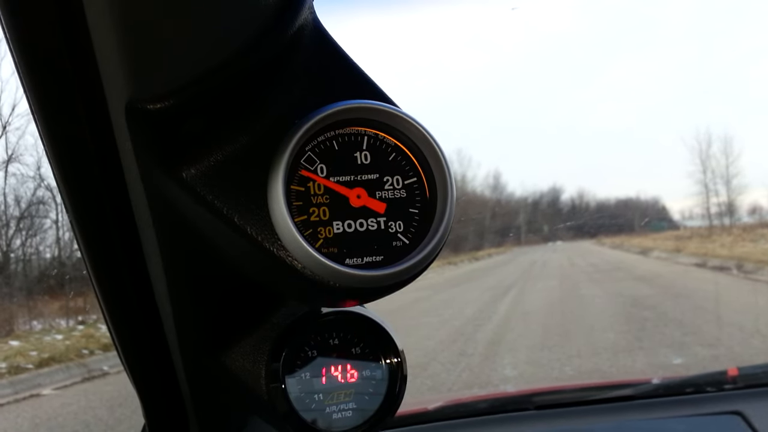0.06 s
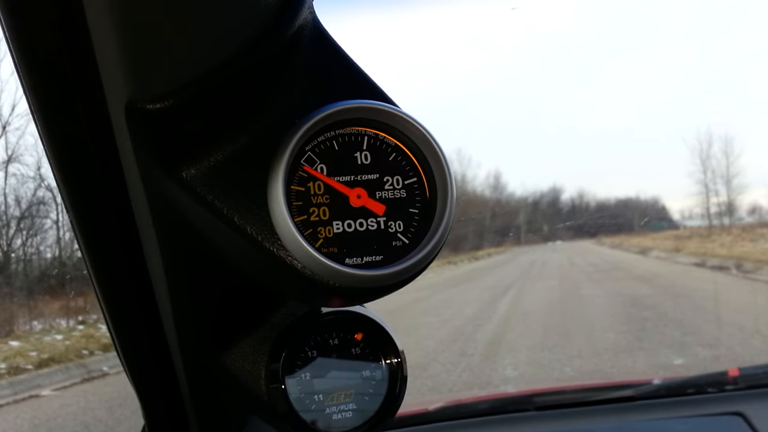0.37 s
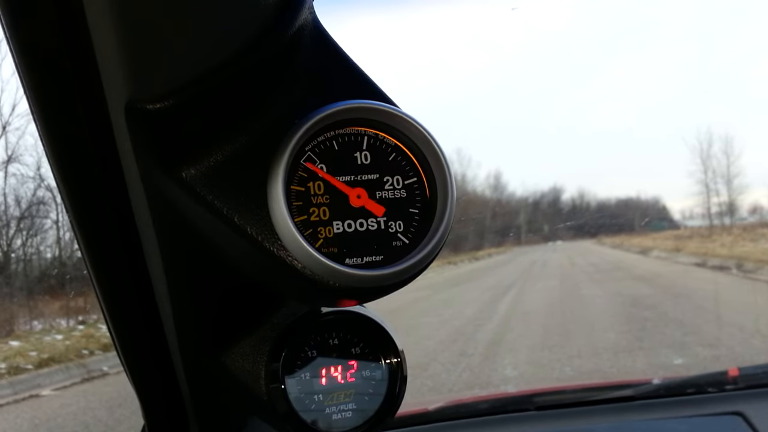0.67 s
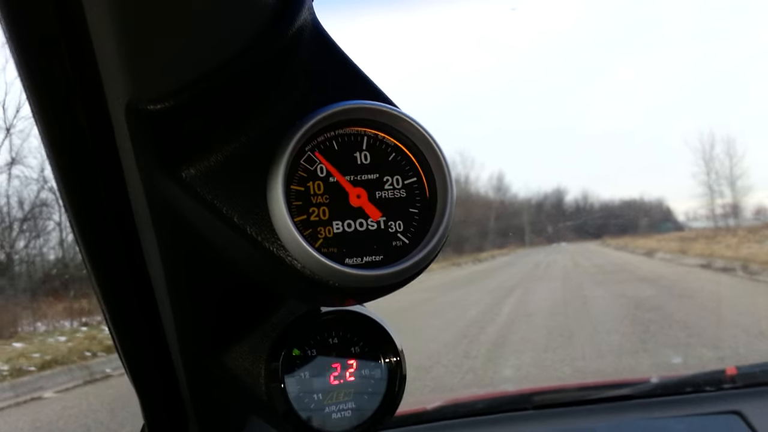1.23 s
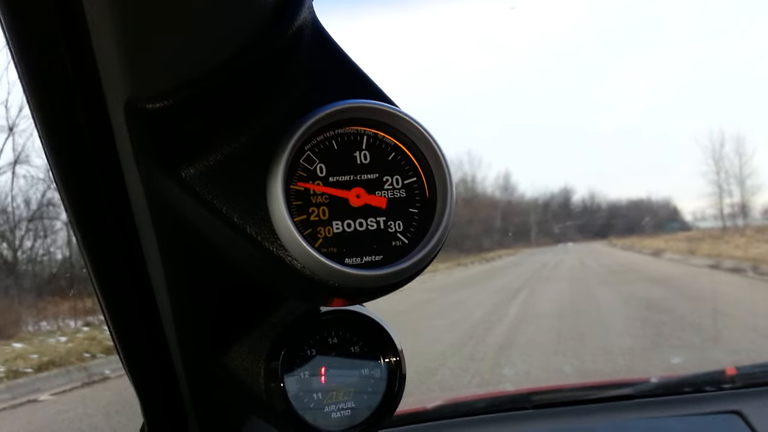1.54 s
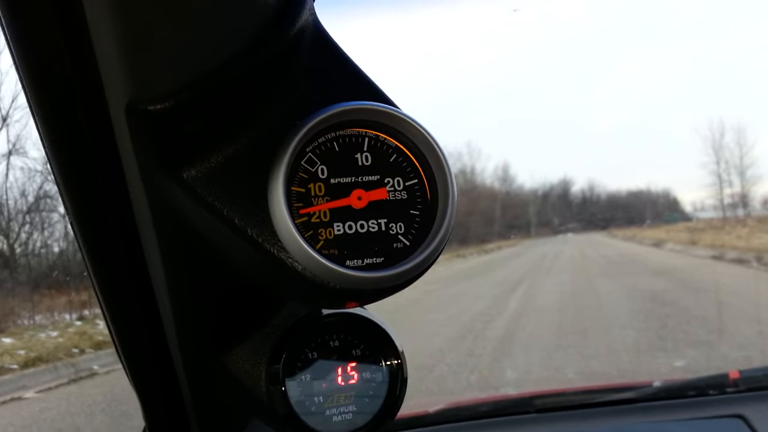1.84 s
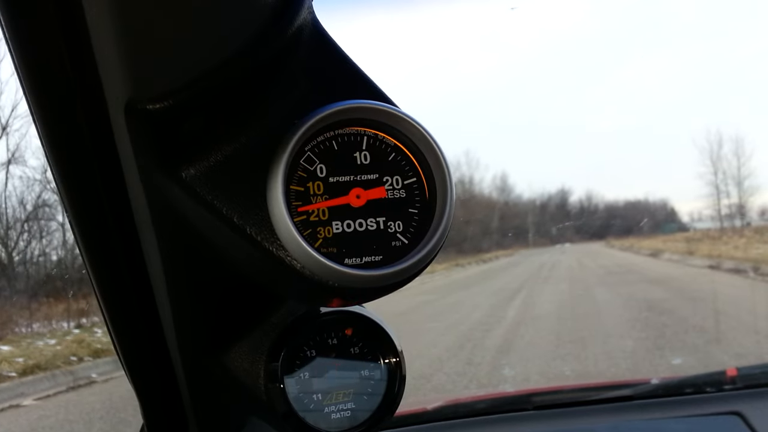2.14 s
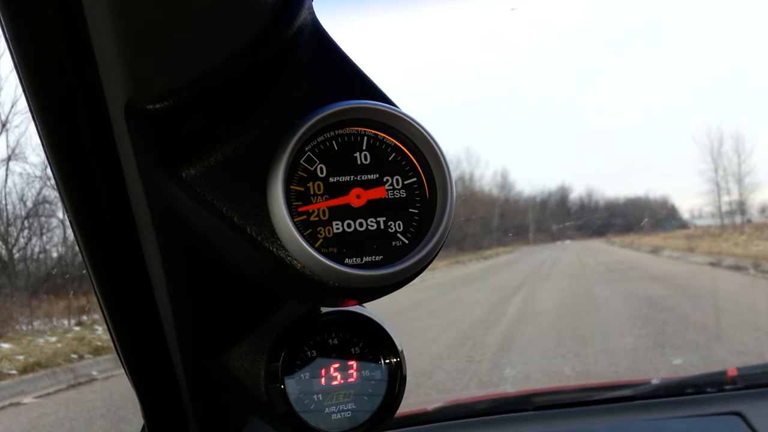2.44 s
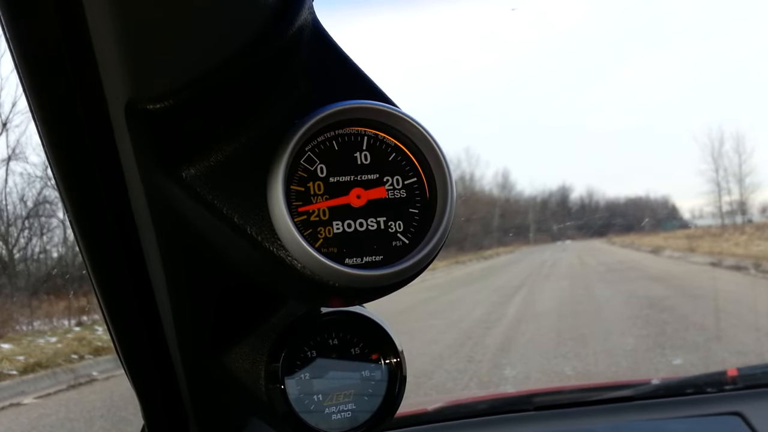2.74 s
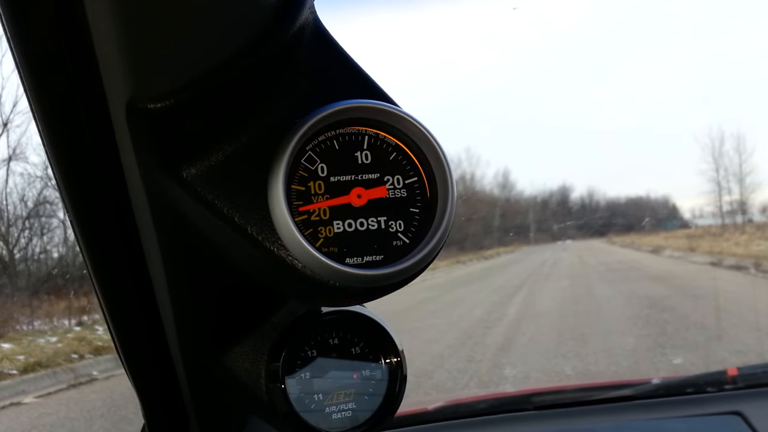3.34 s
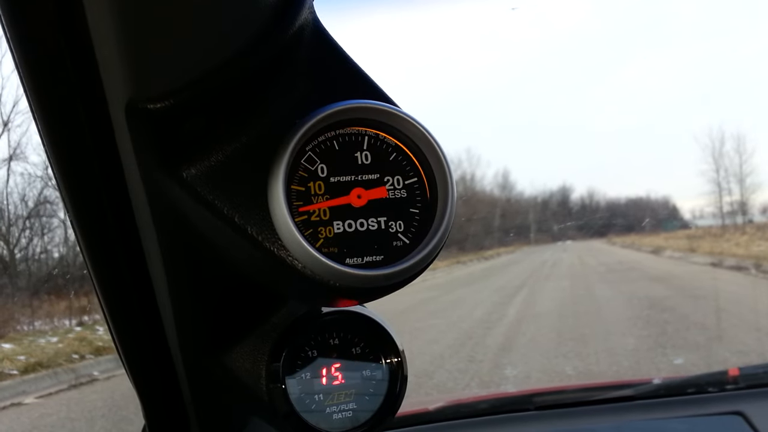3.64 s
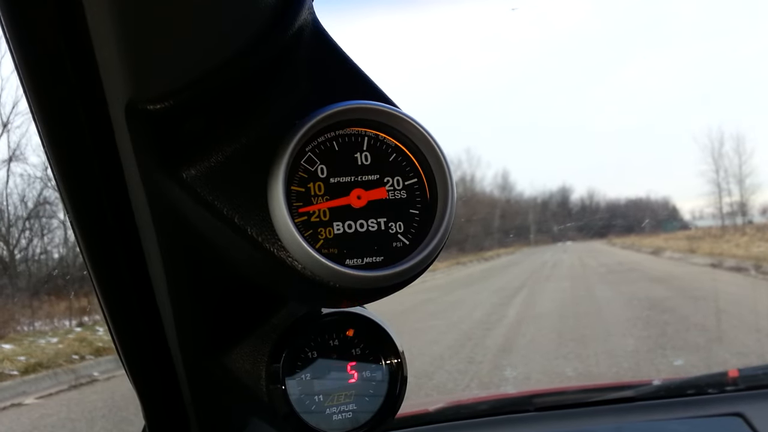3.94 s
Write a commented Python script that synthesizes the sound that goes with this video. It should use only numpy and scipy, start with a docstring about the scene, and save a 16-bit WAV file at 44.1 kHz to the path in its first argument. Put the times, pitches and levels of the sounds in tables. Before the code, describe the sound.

A turbocharged car engine pulls at full throttle, heard inside the cabin, with booming exhaust, rasping intake and a rising whistle. At about 1.5 seconds the throttle shuts: air rushes out and the revs drop quickly. Dull thuds and small rattles come from around 1 second on. From 2 to 4 seconds the whistle falls and the hiss fades over a quieter low drone and steady tyre noise.

```python
"""Inside a turbocharged six-cylinder car, a stereo microphone in the cabin, close to the driver.
At first the engine pulls at full throttle: exhaust pulses boom in the cabin, the intake rasps and
the turbo whistles upward over the road noise. At 1.5 s the driver lifts off: the boost rushes out
and the revs drop. Then the turbo coasts down over a low drone and a fading hiss.
From about 1 s on, the body gives a few dull thuds and small rattles."""
import sys
import numpy as np
from scipy import signal
from scipy.fft import rfft, irfft
from scipy.io import wavfile

SR = 44100
rng = np.random.default_rng(int(sys.argv[2]) if len(sys.argv) > 2 else 0)


def output_pcm(signal):
    """Save a mono or channel-first signal as 16-bit PCM at the path in sys.argv[1].

    Samples are clipped to [-1, 1] before scaling.
    """
    pcm = np.clip(np.atleast_2d(signal).T, -1, 1) * 32767
    wavfile.write(sys.argv[1], SR, np.round(pcm).astype(np.int16))


N = 176400

# intake resonances (centre [Hz], width [Hz], lift [dB])
INTAKE_PEAKS = [(1088, 19, 9.6), (1456, 90, 6), (1744, 37, 7), (1875, 98, 5.9), (2550, 85, 5.5),
                (3380, 60, 5.6), (3970, 340, 2.4)]


def undb(db):
    """Decibels to gain."""
    return 10 ** (np.asarray(db) / 20)


def curve(rows):
    """A control joined by straight lines in time."""
    return np.interp(np.arange(N) / SR, *np.array(rows).T)


def at(rows, hz):
    """Read a spectrum on a log-frequency axis."""
    freqs, db = np.array(rows).T
    return np.interp(np.log(hz + 1e-6), np.log(freqs), db)


def bins():
    """The frequencies of the spectrum."""
    return np.arange(N // 2 + 1) * SR / N


def walk(hz):
    """Smooth random motion of spread 1, up to about hz."""
    drift = irfft(rfft(rng.standard_normal(N)) * np.exp(-.5 * (bins() / hz) ** 2), N)
    return drift / drift.std()


def turning(hz):
    """Phase of something that turns at hz."""
    return 2 * np.pi * np.cumsum(hz) / SR


def burst(start, attack_s, decay_s):
    """An envelope that rises and dies away."""
    age = np.maximum(np.arange(N) / SR - start, 0)
    return (1 - np.exp(-age / attack_s)) * np.exp(-age / decay_s)


def resonance(peaks, hz):
    """Lift in dB that resonances give at hz."""
    return sum(db / (1 + (2 * (hz - centre) / width) ** 2) for centre, width, db in peaks)


def rough_tone(hz, rough, width_hz):
    """A stereo tone whose strength and phase waver."""
    waver = np.array([1 + rough * (walk(width_hz) + 1j * walk(width_hz)) for _ in range(2)])
    return (waver * np.exp(1j * turning(hz))).real


def cabin_modes(depth_db=1.7, step_hz=30, full_hz=2000):
    """Treble peaks and dips, in dB, that many cabin modes put on one path to the microphone."""
    hz = np.arange(0, SR / 2, step_hz)
    ripple = rng.standard_normal(4096)[:len(hz)]
    return depth_db * np.interp(bins(), hz, ripple * np.clip(hz / full_hz, 0, 1) ** 2)


def spread(mid, side, hz):
    """Left and right from mid and side, with the cabin's lean."""
    # balance at the microphone (frequency [Hz], left minus right [dB])
    lean = [(110, -1), (370, 2.5), (670, 3), (1150, 4.5), (2200, -1.5), (4130, 0), (7560, -6.5),
            (13800, -2)]
    sign = np.array([[1], [-1]])
    return (mid + sign * side) * undb(sign * at(lean, hz) / 2)


def air(colour, peaks=(), lag_s=.00043, lag_above_hz=2000):
    """Coloured stereo turbulence in the cabin; its treble reaches the left side later."""
    # stereo width (frequency [Hz], side minus mid [dB])
    width = [(30, -12), (60, -19), (200, -19), (370, -9), (670, -3.5), (1230, 3.5), (2260, -1.5),
             (7000, 1.5), (13800, -4)]
    hz = bins()
    gain = undb(at(colour, hz) + cabin_modes() + resonance(peaks, hz))
    mid, side = rfft(rng.standard_normal((2, N))) * gain / np.sqrt(np.mean(gain ** 2))
    left, right = spread(mid, side * undb(at(width, hz)), hz)
    delay = np.exp(-2j * np.pi * hz * lag_s * (hz > lag_above_hz))
    return irfft(np.array([left * delay, right]), N)


def road(level_db=-39, flicker_db=.5):
    """Tyres rolling on the road, a steady bed under everything."""
    # tyre spectrum (frequency [Hz], density [dB])
    colour = [(25, -26), (50, -1), (90, -8), (200, -0.5), (400, 2), (650, -7.5), (900, -9), (1150, -13.5),
              (1500, -17.5), (3000, -30.5), (8000, -38)]
    return air(colour) * undb(level_db + flicker_db * walk(21))


def rattles():
    """Dull thuds through the body and short bright ticks around the microphone."""
    # thuds (time [s], level [dB])
    thuds = [(1.085, -12.5), (1.24, -15), (1.42, -11), (1.59, -25), (1.81, -11.5), (2.4, -19), (2.49, -42)]
    # their spectrum (frequency [Hz], density [dB])
    colour = [(25, -13), (45, -17), (65, 4), (100, -34), (200, 4), (600, -40)]
    # ticks (time [s], level [dB], centre [Hz], width [octaves], decay [s])
    ticks = [(1.072, -25.5, 3400, 0.1, 0.0082), (1.801, -18, 11900, 0.3, .006),
             (2.408, -40, 3500, 1.8, 0.019), (2.612, -36, 3200, .8, .012),
             (2.961, -32.5, 3300, 0.57, 0.0062), (3.742, -40, 3780, 0.65, 0.0037)]
    out = air(colour) * sum(undb(db) * burst(start, attack_s=.06, decay_s=.1) for start, db in thuds)
    for start, db, hz, octaves, decay in ticks:
        band = [(hz * 2 ** (k * octaves), -6 * k * k) for k in range(-3, 4)]
        out += air(band) * undb(db) * burst(start, attack_s=.00093, decay_s=decay)
    return out


def rumble():
    """A low rumble fills the cabin, strongest around the lift-off."""
    # spectrum (frequency [Hz], density [dB])
    colour = [(20, -48), (35, -21), (52, -1.5), (90, -2.5), (170, -2.5), (330, -1), (440, -12), (640, -8.5),
              (850, -29.5), (1500, -45), (3000, -72)]
    # swell (time [s], level [dB])
    level = [(0, -35), (.9, -25.5), (1.1, -20.5), (1.3, -24), (1.55, -19), (1.85, -18.5), (2.05, -22.5),
             (2.25, -27.5), (2.55, -28), (2.9, -31.5), (3.7, -35.5), (4, -33)]
    return air(colour) * undb(curve(level))


def belt_whine(cycle_hz):
    """Belt and valve gear whine under load, louder where they cross an intake resonance."""
    # tones (multiple of the cycle rate, level [dB])
    orders = [(42, -33.5), (54, -36), (58, -33.5), (61.75, -32), (67, -65), (91.7, -37), (108, -35.5)]
    # swell and fade (time [s], level [dB])
    level = [(0, -13), (.45, -12), (.6, -11.5), (1, -11), (1.2, -15), (1.45, -6), (1.55, -20), (1.8, -46)]
    out = 0
    for order, db in orders:
        hz = order * cycle_hz
        out += undb(db + resonance(INTAKE_PEAKS, hz)) * rough_tone(hz, rough=.4, width_hz=5.2)
    return out * undb(curve(level))


def throttle_hiss(flicker_db=.5):
    """Air hisses past the throttle, most just after it shuts."""
    # spectrum (frequency [Hz], density [dB])
    colour = [(800, 8), (1700, 2), (2400, 6), (3200, -0.5), (4100, -2), (5500, -5.5), (7000, -16.5),
              (10000, -16), (14000, -64)]
    # flow (time [s], level [dB])
    level = [(1.5, -43), (1.9, -34.5), (2.3, -38), (2.6, -40), (3, -46), (3.5, -51.5), (4, -52)]
    return air(colour) * undb(curve(level) + flicker_db * walk(57.5))


def intake_rasp(cycle_hz, firing_depth=.12, flicker_db=.5):
    """Air drawn through the resonant intake pulses with the six firings of each cycle."""
    # spectrum (frequency [Hz], density [dB])
    colour = [(300, -9), (600, 10.5), (1000, 1), (1300, -4.5), (2000, -4.5), (3000, -9.5), (4300, -10),
              (5000, -12.5), (6000, -20), (9500, -21.5), (14000, -68.5)]
    # flow (time [s], level [dB])
    level = [(0, -28.5), (.5, -26), (1, -24), (1.48, -24.5), (1.65, -27.5), (2.1, -55), (2.5, -70)]
    pulse = 1 + firing_depth * np.cos(6 * turning(cycle_hz))
    return pulse * air(colour, INTAKE_PEAKS) * undb(curve(level) + flicker_db * walk(57.5))


def boost_rush(flutter_db=1.44):
    """Air flutters through the turbo and its bypass, surging as the boost is dumped."""
    # spectrum (frequency [Hz], density [dB])
    colour = [(300, -28), (650, 13.5), (1150, 4.5), (1550, -3.5), (2200, -6.5), (3000, -2), (4100, -1.5),
              (5000, -6.5), (6300, -8), (9500, -10), (12500, -12.5), (14500, -32)]
    # resonances (centre [Hz], width [Hz], lift [dB])
    peaks = [(666, 29, 4.7), (1074, 28, 10), (1280, 35, 8), (1708, 14, 15), (2085, 26, 17), (2820, 130, 9),
             (3287, 69, 9.7), (3810, 100, 9), (4190, 82, 9), (4690, 54, 9.8), (4970, 120, 8.1)]
    # flow (time [s], level [dB])
    level = [(0, -39.5), (.9, -34), (1.41, -29.5), (1.52, -22.5), (1.75, -23.5), (2, -30.5), (2.3, -38),
             (2.7, -46), (3.2, -49.5), (4, -57)]
    return air(colour, peaks) * undb(curve(level) + flutter_db * walk(57.5))


def turbo_whistle(patchy_db=3.5, rightward_db=1.5):
    """Three harmonics of the blade tone fade in and out; the faster the flow, the rougher they are."""
    # blade tone (time [s], frequency [Hz])
    blade_tone = [(0, 3800), (.4, 4300), (.8, 5110), (1.2, 6090), (1.5, 6930), (1.57, 6900), (1.7, 6080),
                  (1.8, 5450), (2, 4520), (2.35, 3470), (2.7, 2820), (3, 2400), (3.6, 1865), (4, 1590)]
    # its harmonics, each (time [s], level [dB])
    first = [(1.2, -54), (1.45, -53), (1.51, -41), (1.58, -51), (1.9, -59), (2.2, -80)]
    second = [(0, -76), (.5, -57), (1, -55), (1.42, -56), (1.53, -43.5), (1.8, -41.5), (1.9, -48),
              (2.05, -61), (2.2, -80)]
    third = [(1.9, -82), (2.1, -65), (2.35, -58), (2.5, -72), (2.7, -63), (3.3, -73), (3.6, -64),
             (3.75, -76), (3.86, -62), (4, -57)]
    out, blade_hz = 0, curve(blade_tone)
    rough = 2.17 * blade_hz / 6540
    for harmonic, level in enumerate([first, second, third], start=1):
        tone = rough_tone(harmonic * blade_hz, rough, width_hz=55)
        out += tone * undb(curve(level) - patchy_db * walk(28))
    return out * undb(np.array([[-rightward_db], [rightward_db]]) / 2)


def exhaust(cycle_hz, orders, rough, wobble_hz=18):
    """Harmonics of the engine cycle slide through the cabin boom; uneven firings shake each one."""
    # response of exhaust and cabin (frequency [Hz], gain [dB])
    boom = [(30, -34), (55, -20.5), (90, -25), (115, -5.5), (140, -11.5), (160, -1), (185, 1.5),
            (215, -9.5), (280, -13), (370, -10.5), (450, -15.5), (650, -35.5), (900, -46.5), (1500, -11.5)]
    # stereo width (frequency [Hz], side minus mid [dB])
    width = [(60, -11), (180, -30.5), (260, -14.5), (400, -9), (700, 3.5)]
    out, phase = 0, turning(cycle_hz)
    shake = walk(wobble_hz) + 1j * walk(wobble_hz)
    for order, db in orders:
        hz = order * cycle_hz
        start_turns, side_turns, shift = rng.random(3)
        tone = np.exp(1j * (order * phase + 2 * np.pi * start_turns))
        tone *= 1 + rough * np.roll(shake, int(shift * N))
        tone *= np.sqrt(2) * undb(db + at(boom, hz))
        side = (tone * np.exp(2j * np.pi * side_turns)).real * undb(at(width, hz))
        out += spread(tone.real, side, hz)
    return out


def exhaust_lope(cycle_hz):
    """Orders 5 and 7 beat unevenly beside the firing note."""
    # swells early, fades toward lift-off, returns briefly as the revs drop (time [s], level [dB])
    fifth = [(0, -37.5), (.45, -32), (.6, -5), (1, -9), (1.2, -15), (1.5, -24), (1.8, -9.5), (2.2, -53)]
    # peaks early in the pull, then thins out (time [s], level [dB])
    seventh = [(0, -18), (.45, -13), (.9, -19.5), (1.2, -23), (1.5, -25), (1.9, -25), (2.3, -60)]
    return sum(exhaust(cycle_hz, [(order, 0)], rough=.12) * undb(curve(level))
               for order, level in [(5, fifth), (7, seventh)])


def exhaust_coast(cycle_hz):
    """With the throttle shut, the banks' odd beats lead in a hollow drone."""
    # harmonics (multiple of the cycle rate, level [dB])
    orders = [(4, -8), (6, -3.5), (9, 3), (12, -23.5), (13, -12), (14, -16), (15, -3), (18, -20.5),
              (21, -11), (27, -11), (33, -20)]
    # drone (time [s], level [dB])
    level = [(1.45, -31), (1.57, -9), (1.8, -12), (1.95, -13.5), (2.03, -16), (2.15, -17), (2.45, -20.5),
             (2.58, -14.5), (2.8, -19), (3.1, -17), (3.8, -11.5), (3.9, -13.5), (4, -11)]
    return exhaust(cycle_hz, orders, rough=.11) * undb(curve(level))


def exhaust_pull(cycle_hz, upper_db=-10):
    """The lumpy exhaust note at full throttle; order 6 is the firing rate."""
    # harmonics (multiple of the cycle rate, level [dB])
    orders = [(2, 0.5), (3, 2.5), (4, -2.5), (6, -0.5), (8, -10.5), (9, 0), (10, -5), (11, -4), (12, -0.5),
              (13, -7.5), (14, -8), (15, -11.5), (16, -18), (17, -6.5), (18, -1), (19, -6), (20, 1),
              (21, -17), (22, 4.5), (24, -21), (30, 7)]
    # load (time [s], level [dB])
    level = [(0, -9), (.45, -10.5), (.6, -9), (.85, -9.5), (1.08, -10), (1.2, -7), (1.45, -8), (1.6, -11.5),
             (1.75, -23.5), (2.05, -32), (2.4, -55)]
    note = exhaust(cycle_hz, orders, rough=.12)
    upper = exhaust(cycle_hz, [(order, upper_db) for order in range(23, 40)], rough=.16)
    return (note + upper) * undb(curve(level))


def scene():
    """Engine, gas flow, turbo, rattles and road as they meet at the microphone."""
    # engine speed (time [s], four-stroke cycle rate [Hz])
    speed = [(0, 26.15), (.5, 27.93), (.78, 28.75), (1, 30.4), (1.25, 31.09), (1.48, 31.85), (1.55, 30.6),
             (1.65, 25.2), (1.8, 19.9), (1.9, 17.1), (2, 15.1), (2.1, 14.15), (2.3, 13.2), (2.5, 11.96),
             (2.7, 11.25), (3.5, 10.36), (3.87, 10.18), (4, 9.4)]
    cycle_hz = curve(speed)
    engine = exhaust_pull(cycle_hz) + belt_whine(cycle_hz)
    engine += exhaust_lope(cycle_hz) + exhaust_coast(cycle_hz)
    gas = rumble() + intake_rasp(cycle_hz) + boost_rush() + throttle_hiss()
    return engine + gas + turbo_whistle() + rattles() + road()


def record(dry):
    """The recorder rounds the loudest peaks and cuts the deepest bass and the top."""
    ceiling, knee = 1.36, 2.8
    low_cut_hz, top_hz = 36, 14250
    rounded = dry / (1 + np.abs(dry / ceiling) ** knee) ** (1 / knee)
    low_cut = 1 - np.exp(-(bins() / low_cut_hz) ** 4)
    trimmed = irfft(rfft(rounded) * low_cut, N)
    return signal.sosfilt(signal.ellip(10, .2, 80, top_hz, fs=SR, output="sos"), trimmed)


dry = scene()
out = record(dry)
output_pcm(out)
```